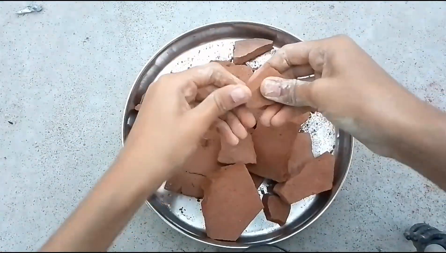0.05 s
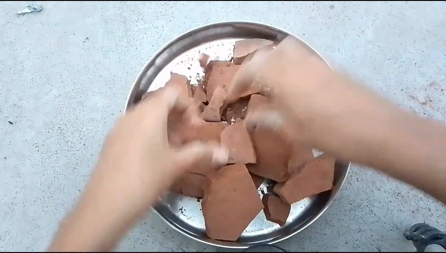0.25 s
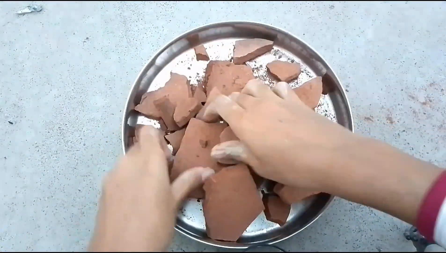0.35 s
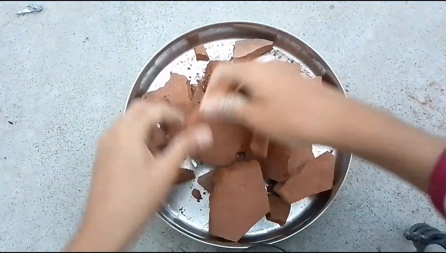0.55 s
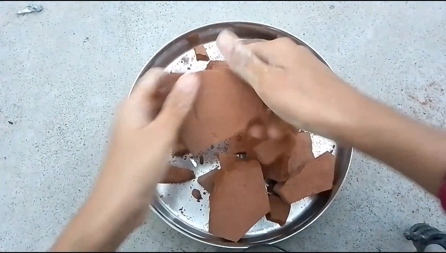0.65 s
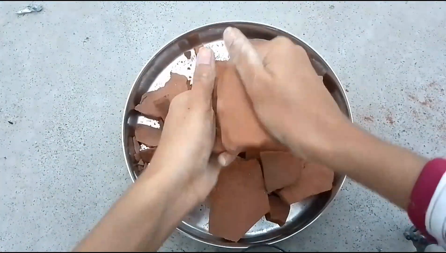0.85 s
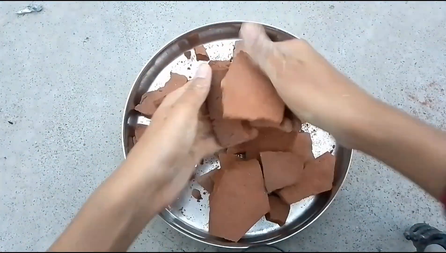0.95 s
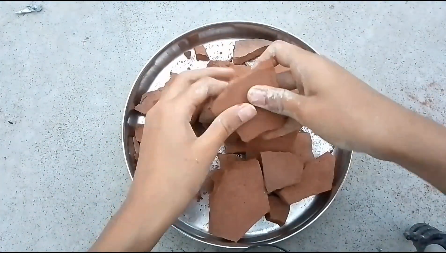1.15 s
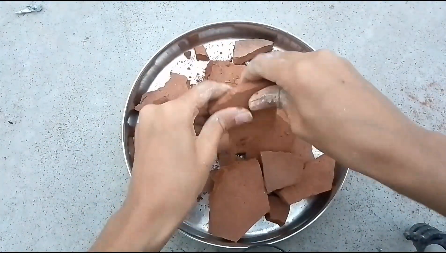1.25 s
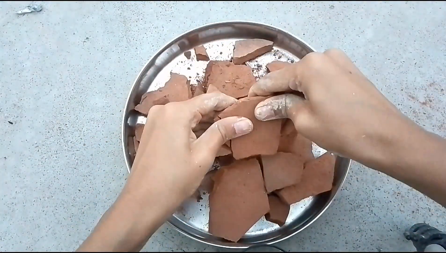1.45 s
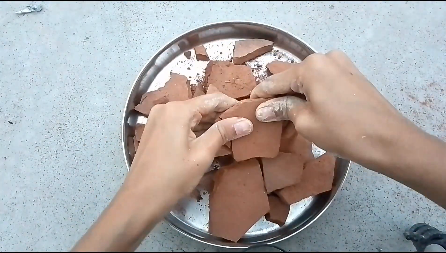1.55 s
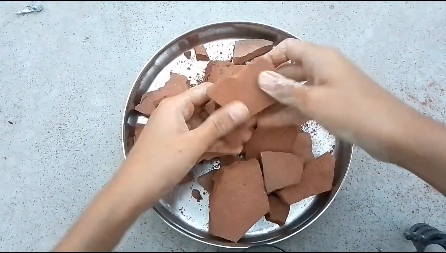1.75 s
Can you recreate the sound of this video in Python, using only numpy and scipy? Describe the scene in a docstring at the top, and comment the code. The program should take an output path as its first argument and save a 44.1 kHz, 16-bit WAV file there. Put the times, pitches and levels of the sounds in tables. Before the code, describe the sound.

Close, dry sound of clay shards breaking over a loaded steel bowl; light crunches lead to sharp clinks, gritty rubbing with a falling hollow note, near silence, another crisp double snap and a faint last scrape.

```python
"""Two hands handle and snap slabs of dry clay over a steel bowl full of shards, heard from close by.
A low damped murmur of the bowl (noise in three modes) and still air last throughout. Small crunches (bursts
of fracture clicks) and knocks (single modes) come first, then ringing clinks and louder snaps. Next the clay
slides: streams of slips, ticking grit and a falling hollow note. A dragged edge sings; it turns quiet before
more snaps, squeaks (sines of slightly unsteady pitch) and a last drag. The steel and a faint room tail answer."""
import sys
import numpy as np
from scipy import signal
from scipy.fft import rfft, irfft
from scipy.io import wavfile
from scipy.ndimage import uniform_filter1d

SR = 44100
rng = np.random.default_rng(int(sys.argv[2]) if len(sys.argv) > 2 else 0)


def bounce(signal):
    """Save signal as a 16-bit WAV file at the path given by the first command-line argument."""
    frames = np.transpose(np.atleast_2d(signal))
    limited = np.clip(frames, -1, 1)
    pcm = np.round(limited * 32767).astype(np.int16)
    wavfile.write(sys.argv[1], SR, pcm)


N = 79380
TIME = np.arange(N) / SR
BRIEF = np.arange(2600) / SR  # time axis of one knock or crunch
FILTER_HZ = np.maximum(np.fft.rfftfreq(2048, 1 / SR), 10)  # kept above 0 for the log axis

KNOCK_ATTACK_S, CONTACT_EDGE_HZ = 0.0014, 3400  # a crumbly contact barely excites modes above this
CRUNCH_RISE_S, CRUNCH_FALL_S, FRACTURES_PER_S, FRACTURE_SPREAD_DB = 0.0011, 0.0021, 9000, 1.5
CLAY_CENTRE_HZ, BASS_EDGE_HZ, TREBLE_EDGE_HZ = 1919, 1900, 4600
CRACK_EVENNESS = 0.4  # 0 = strength left to chance, 1 = the crack advances at an even strength
SLIPS_PER_S, SLIP_SPREAD_DB = 2800, 3.5
GRAINS_PER_S, GRAIN_SPREAD_DB, GRAIN_WIDTH_HZ = 11000, 3.5, 600
SLIDE_DB = -1.5  # overall change to rub, grit and hollow note
GAP_WIDTH_HZ, DRAG_WIDTH_HZ = 100, 330
SQUEAK_WAVER = 0.01  # rms, as a share of the pitch
STEEL_WIDTH_HZ = 38
STEEL_TOP_HZ, STEEL_TOP_DB, STEEL_TOP_WIDTH_HZ = (3570, 13740), 4.5, 56  # its many high modes
CRUNCH_STEEL_DB, SLIDE_STEEL_DB = -7, -3.5  # how strongly each drives the bowl
AIR_DB = -69
ROOM_DB, ROOM_T60_S, ROOM_DULL_HZ = -33, 0.16, 3500
CUTOFF_HZ = 15500


def from_db(db):
    """Decibels to gain."""
    return 10 ** (np.asarray(db) / 20)


def rms_one(x):
    """Scale to unit rms, the usual measure of average strength."""
    return x / np.sqrt(np.mean(x ** 2) + 1e-20)


def in_time(rows):
    """Each column of a curve at every sample."""
    s, *columns = np.transpose(rows)
    return [np.interp(TIME, s, c) for c in columns]


def at_hz(points, hz):
    """Read a spectrum on a log-frequency axis."""
    f, db = np.transpose(points)
    return np.interp(np.log(hz), np.log(f), db)


def add(out, s, sound):
    """Mix a short sound in at time s."""
    i = max(int(s * SR), 0)
    out[i:i + len(sound)] += sound[:max(N - i, 0)]


def clicks(per_s, spread_db, size):
    """Random clicks of uneven strength and sign."""
    strength = from_db(spread_db * np.minimum(rng.exponential(1, size), 4))
    happens = rng.random(size) < per_s / SR
    return happens * strength * rng.choice([-1, 1], size) + 1e-12


def coloured(x, level_db):
    """Pass x through the tightest causal filter with this level per Hz; rms 1."""
    cepstrum = irfft(np.log(from_db(level_db)))
    half = len(cepstrum) // 2
    # folding the second half onto the first makes the filter answer as early as it can
    folded = np.concatenate([cepstrum[:1], 2 * cepstrum[1:half], np.zeros(half)])
    response = irfft(np.exp(rfft(folded)))
    return rms_one(signal.fftconvolve(x, response)[:len(x)])


def resonance(hz, width_hz):
    """Noise in one narrow resonance, whose centre may move; rms 1."""
    lowpass = signal.butter(2, width_hz / 2, fs=SR, output="sos")
    # the first second is dropped so that the filter has settled
    sway = signal.sosfilt(lowpass, rng.standard_normal((2, N + SR)))[:, SR:]
    phase = 2 * np.pi * np.cumsum(hz * np.ones(N)) / SR
    return rms_one(sway[0] * np.cos(phase) + sway[1] * np.sin(phase))


def peak(x, hz, width_hz):
    """Pass x through one resonance with unit gain at its top."""
    r = np.exp(-np.pi * width_hz / SR)
    b = np.array([1, 0, -1]) * (1 - r * r) / 2
    a = [1, -2 * r * np.cos(2 * np.pi * hz / SR), r * r]
    return signal.lfilter(b, a, x)


def knock(t60):
    """Envelope of a knock: a quick rise, then a free decay by 60 dB in t60 seconds."""
    rise = np.minimum(BRIEF / KNOCK_ATTACK_S, 1)
    return rise * from_db(-60 * np.maximum(BRIEF - KNOCK_ATTACK_S, 0) / t60)


def bowl():
    """The bowl's low modes, damped by the load, murmur under the hands."""
    # level of the murmur: (time [s], level [dB])
    murmur_level = [(0, -69), (.15, -61), (.3, -65.5), (.42, -53), (.52, -64.5), (.91, -64), (.95, -53),
                    (1.01, -73.5), (1.15, -72.5), (1.22, -62), (1.35, -67.5), (1.44, -58.5), (1.55, -57.5),
                    (1.62, -73), (1.7, -70), (1.8, -60.5)]
    # damped modes: (frequency [Hz], width [Hz], level relative to the others [dB])
    low_modes = [(240.9, 39, -2), (290, 86, 1.5), (346.8, 75, -2.5)]
    murmur = sum(from_db(db) * resonance(hz, width) for hz, width, db in low_modes)
    level_db, = in_time(murmur_level)
    return from_db(level_db) * rms_one(murmur)


def still_air():
    """The quiet place: steady noise, coloured by a fixed spectrum."""
    # colour of the air: (frequency [Hz], relative level [dB])
    air_colour = [(25, -1.5), (75, -3.5), (110, 1.5), (165, -13.5), (260, -5.5), (450, -14), (680, -4.5),
                  (1000, -11.5), (2000, -24), (4000, -35.5), (15000, -32)]
    noise = coloured(rng.standard_normal(N + SR), at_hz(air_colour, FILTER_HZ))[SR:]
    return from_db(AIR_DB) * noise


def rub():
    """A stream of tiny slips between two clay faces."""
    # clay rubbing on clay, before the overall slide change: (time [s], level [dB])
    rub_level = [(0, -79), (.04, -56), (.09, -66), (.15, -56), (.19, -69.5), (.32, -79.5), (.45, -46.5),
                 (.47, -50.5), (.5, -45.5), (.535, -56.5), (.553, -44.5), (.575, -52), (.62, -48),
                 (.67, -50.5), (.745, -70.5), (.805, -73), (.83, -58.5), (.87, -63.5), (1, -81),
                 (1.16, -80.5), (1.2, -56), (1.29, -73), (1.35, -62), (1.4, -49.5), (1.46, -66), (1.5, -70),
                 (1.68, -82), (1.71, -66), (1.76, -76), (1.8, -64.5)]
    # colour of the rubbing: (frequency [Hz], relative level [dB])
    rub_colour = [(250, -15.5), (500, -7), (900, -1), (1400, 6.5), (2000, -0.5), (2700, 5), (3400, -15),
                  (6000, -16.5), (13000, -27), (15500, -37)]
    slips = clicks(SLIPS_PER_S, SLIP_SPREAD_DB, size=N)
    level_db, = in_time(rub_level)
    return from_db(level_db) * coloured(slips, at_hz(rub_colour, FILTER_HZ))


def grit():
    """Loose grains roll between the pieces, ticking unevenly at one of 24 pitches."""
    # rolling grit, before the overall slide change: (time [s], level [dB])
    grit_level = [(0, -79.5), (.34, -95), (.4, -62.5), (.445, -56.5), (.47, -69), (.49, -49.5),
                  (.53, -71.5), (.553, -58.5), (.578, -79), (.617, -52), (.7, -63), (.745, -79.5),
                  (.81, -77), (.85, -69), (.92, -86.5), (1.16, -79.5), (1.2, -69.5), (1.26, -84.5),
                  (1.44, -72.5), (1.47, -83), (1.692, -86.5), (1.701, -64.5), (1.733, -70.5), (1.75, -91)]
    # colour of the grit: (frequency [Hz], relative level [dB])
    grit_colour = [(1500, -20), (3000, 5), (4500, -2), (7000, -3.5), (10000, -6.5), (13200, -9.5),
                   (15500, -26)]
    pitches = np.linspace(1500, 15000, 24)
    ticks = np.zeros(N)
    for hz in pitches:
        grains = clicks(GRAINS_PER_S / len(pitches), GRAIN_SPREAD_DB, size=N)
        ticks += peak(grains, hz, GRAIN_WIDTH_HZ)
    level_db, = in_time(grit_level)
    return from_db(level_db) * coloured(ticks, at_hz(grit_colour, FILTER_HZ))


def steadied(burst, shape):
    """Draw a burst's running level towards its envelope."""
    burst = burst * np.sqrt(np.mean(shape ** 2))
    # running power over about 3 ms
    wanted, found = uniform_filter1d(np.array([shape, burst]) ** 2, size=130, axis=1) + 1e-3
    return burst * (wanted / found) ** (np.clip(CRACK_EVENNESS, 0, 1) / 2)


def crunches():
    """A crack runs through the clay as a dense burst of fractures, then dies at once."""
    # runs of tiny fractures:
    # (time [s], length before the fall [s], level [dB], bass change [dB], treble change [dB], centre [Hz])
    cracks = [(0.0102, 0.0058, -38, 3.5, -0.5, 1860), (0.053, 0.0071, -47.5, 2, -29, 1700),
              (0.1047, 0.00079, -44.5, -3, -34, 1760), (0.135, 0.00084, -38, -1, 2.5, 2030),
              (0.152, 0.0047, -45.5, 3, -36, 1490), (0.2118, 0.009, -34, -5, 2.5, 2075),
              (0.3391, 0.0074, -46.5, 1.5, 10, 1550), (0.3747, 0.0022, -34, -2.5, 6, 1620),
              (0.378, 0.0031, -23.5, 2, 9, 2030), (0.3825, 0.01, -32.5, -0.5, 9, 1670),
              (0.4171, 0.0077, -20, 1.5, 0, 1944), (0.427, 0.006, -33.5, -12, -2, 2170),
              (0.4377, 0.0027, -24.5, 2.5, 7, 1900), (0.479, 0.0073, -37, 9, 14, 2040),
              (0.61, 0.0062, -41, -13, 5, 2100), (0.628, 0.0052, -49, -16, 9, 1900),
              (0.646, 0.0054, -44.5, 9, 6, 1590), (0.7223, 0.0059, -53, 4, 21.5, 2050),
              (0.8151, 0.0019, -39, -5, 10, 2330), (0.94, 0.0042, -55.5, -2.5, 20.5, 1924),
              (1.1778, 0.0028, -38.5, 4.5, 8.5, 1965), (1.181, 0.0075, -32.5, 0.5, 9.5, 1960),
              (1.206, 0.0024, -53.5, 0, 12.5, 1990), (1.2184, 0.011, -51.5, 9.5, 5, 1730),
              (1.311, 0.0049, -48.5, -10.5, 8, 1190), (1.36, 0.0087, -40, 5, 0.5, 2040),
              (1.369, 0.012, -39, 1, 8, 1800), (1.385, 0.0082, -48.5, 4, 6, 1900),
              (1.4118, 0.0058, -22.5, 0, 0, 1610), (1.422, 0.012, -33.5, -4, -6.5, 1620),
              (1.433, 0.0043, -22, 1, -6, 1700), (1.4392, 0.0041, -28.5, -2, -3.5, 2000),
              (1.543, 0.00038, -42.5, 26.5, 25.5, 1903), (1.699, 0.0036, -60, 24, 26, 1540)]
    # colour of breaking clay at its usual centre: (frequency [Hz], relative level [dB])
    clay_colour = [(30, -43.5), (100, -31.5), (170, -38), (260, -23), (450, -16), (650, -8.5), (900, -6.5),
                   (1350, -0.5), (2000, 2.5), (2700, 2.5), (3400, -12.5), (5000, -18.5), (7000, -28),
                   (10000, -35), (13500, -36.5), (15500, -47)]
    out = np.zeros(N)
    bass = 1 / (1 + (FILTER_HZ / BASS_EDGE_HZ) ** 4)
    treble = 1 / (1 + (TREBLE_EDGE_HZ / FILTER_HZ) ** 6)
    for s, length, db, bass_db, treble_db, hz in cracks:
        rise = np.minimum(BRIEF / CRUNCH_RISE_S, 1)
        shape = rise * np.exp(-np.maximum(BRIEF - length, 0) / CRUNCH_FALL_S)
        # slide the usual colour up or down to this crack's centre
        colour = at_hz(clay_colour, FILTER_HZ * CLAY_CENTRE_HZ / hz)
        colour = colour + bass_db * bass + treble_db * treble
        fractures = shape * clicks(FRACTURES_PER_S, FRACTURE_SPREAD_DB, size=len(BRIEF))
        burst = coloured(fractures, colour)
        add(out, s, from_db(db) * steadied(burst, shape))
    return out


def steel(x):
    """The bowl's upper modes, heavily damped by the clay lying in it, ring with x."""
    # single modes: (frequency [Hz], share [dB])
    steel_modes = [(1007, 0), (1354, 1.5), (1480, -7.5), (1989, 4), (2634, 0), (3009, -3), (4566, -10.5)]
    top_hz = rng.uniform(*STEEL_TOP_HZ, size=18)
    top = sum(peak(x, hz, STEEL_TOP_WIDTH_HZ) for hz in top_hz)
    single = sum(from_db(db) * peak(x, hz, STEEL_WIDTH_HZ) for hz, db in steel_modes)
    return from_db(STEEL_TOP_DB) * top + single


def pings():
    """A knocked chip or lump rings in a single mode, the larger the lower."""
    # (time [s], level [dB], frequency [Hz], decay by 60 dB [s])
    knocks = [(.0608, -40, 2120, 0.032), (.1585, -36.5, 1266, 0.013), (0.3866, -26, 1390, .028),
              (.4182, -32.5, 635, 0.032), (.589, -38.5, 1300, 0.017), (.8147, -38.5, 3080, 0.012),
              (.9408, -48.5, 2633, .017), (1.2055, -63.5, 6270, 0.061), (1.2203, -39, 1150, 0.015),
              (1.229, -47.5, 2560, 0.011), (1.3115, -49.5, 888, 0.022), (1.4108, -35.5, 474, 0.024),
              (1.543, -40, 2497, .015)]
    out = np.zeros(N)
    for s, db, hz, t60 in knocks:
        tone = np.sqrt(2) * np.sin(2 * np.pi * (hz * BRIEF + rng.random()))
        add(out, s, from_db(db) * knock(t60) * tone)
    return out


def clinks():
    """Shard strikes shard: the knock sets a few modes ringing for some milliseconds."""
    # (time [s], level [dB], reference pitch of the modes [Hz], decay by 60 dB [s])
    strikes = [(0.2134, -16.5, 1437, 0.0313), (0.3783, -18, 1440, 0.02), (0.4197, -17.5, 1474, 0.031),
               (.8152, -36.5, 1548, 0.013), (1.3696, -26.5, 1380, 0.017)]
    # a shard's modes: (ratio to the reference pitch [-], level before the contact softens it [dB])
    shard_modes = [(.93, -7), (1, 1), (1.05, 0), (1.36, -0.5), (1.44, -8.5), (1.72, -1.5), (2.04, -11),
                   (3.18, -7)]
    out = np.zeros(N)
    ratio, mode_db = np.transpose(shard_modes)
    for s, db, hz, t60 in strikes:
        phases = rng.uniform(0, 2 * np.pi, (len(ratio), 1))
        gains = from_db(mode_db) / (1 + (hz * ratio / CONTACT_EDGE_HZ) ** 6)
        ring = gains @ np.sin(2 * np.pi * hz * ratio[:, None] * BRIEF + phases)
        shape = knock(t60)
        # the level belongs to the envelope, however the modes happen to add up
        add(out, s, from_db(db) * rms_one(ring * shape) * np.sqrt(np.mean(shape ** 2)))
    return out


def gap_note():
    """Hollow note in the gap under the sliding slab, falling as the gap closes."""
    # before the overall slide change: (time [s], frequency [Hz], level [dB])
    gap = [(.53, 1450, -76), (.595, 1273, -59), (.655, 894.4, -55.5), (.695, 777, -53.5), (.73, 745, -74),
           (.78, 685, -57.5), (.87, 662, -89)]
    gap_hz, gap_db = in_time(gap)
    return from_db(gap_db) * resonance(gap_hz, GAP_WIDTH_HZ)


def drags():
    """A dragged shard edge sings: friction in one resonance, swelling and fading with the stroke."""
    # (time [s], length [s], frequency [Hz], level at the middle of the stroke [dB])
    strokes = [(0.825, 0.071, 2677, -59), (1.297, 0.068, 2427, -59.5), (1.697, 0.058, 638, -63)]
    out = np.zeros(N)
    for s, length, hz, db in strokes:
        swell = np.sin(np.pi * np.clip((TIME - s) / length, 0, 1))
        out += from_db(db) * swell * resonance(hz, DRAG_WIDTH_HZ)
    return out


def squeaks():
    """The gripped slab gives faint tones of slightly unsteady pitch that swell and fade."""
    # (time [s], length [s], average frequency [Hz], level at the middle [dB])
    grips = [(1.503, .04, 785, -55), (1.545, .08, 795, -66)]
    out = np.zeros(N)
    for s, length, hz, db in grips:
        t = np.arange(int(length * SR)) / SR
        waver = rms_one(uniform_filter1d(rng.standard_normal(len(t)), size=400))
        phase = 2 * np.pi * np.cumsum(hz * (1 + SQUEAK_WAVER * waver)) / SR
        swell = np.sin(np.pi * t / length)
        add(out, s, from_db(db) * np.sqrt(2) * swell * np.sin(phase))
    return out


def room(x):
    """A faint, dull tail of reflections, made from decaying noise."""
    t = TIME[:SR // 2]
    lowpass = signal.butter(1, min(ROOM_DULL_HZ, SR / 3), fs=SR, output="sos")
    tail = signal.sosfilt(lowpass, rng.standard_normal(len(t))) * from_db(-60 * t / ROOM_T60_S)
    return from_db(ROOM_DB) * signal.fftconvolve(x, tail / np.sqrt(np.sum(tail ** 2)))[:N]


def scene():
    """Clay, bowl and still air at one close microphone."""
    breaking = crunches()
    sliding = from_db(SLIDE_DB) * (rub() + grit() + gap_note())
    ringing = steel(from_db(CRUNCH_STEEL_DB) * breaking + from_db(SLIDE_STEEL_DB) * sliding)
    clay = clinks() + pings() + breaking + sliding + ringing + drags() + squeaks()
    return (clay + room(clay) + bowl() + still_air())[None]


def record(dry):
    """The top is cut steeply."""
    lowpass = signal.ellip(10, .3, 70, CUTOFF_HZ, fs=SR, output="sos")
    return signal.sosfilt(lowpass, dry)


dry = scene()
out = record(dry)
bounce(out)
```